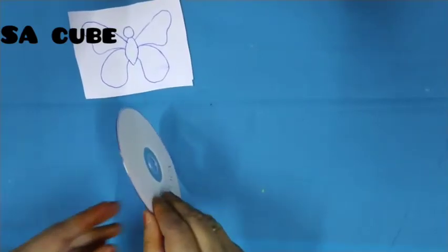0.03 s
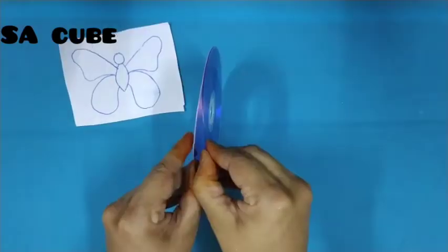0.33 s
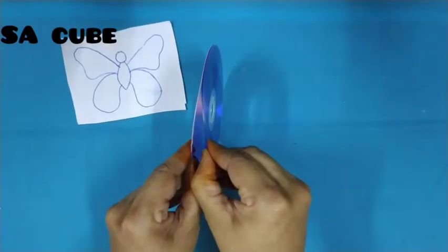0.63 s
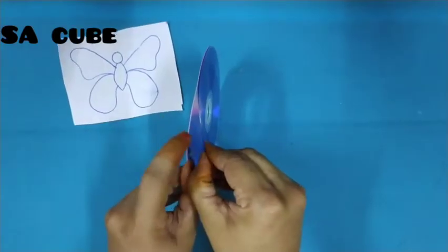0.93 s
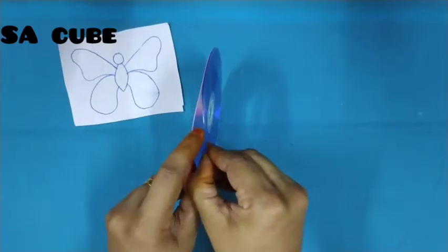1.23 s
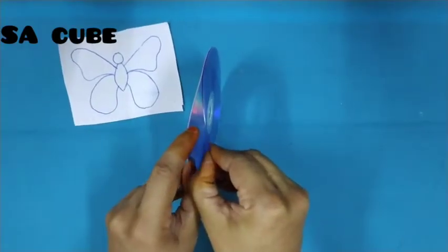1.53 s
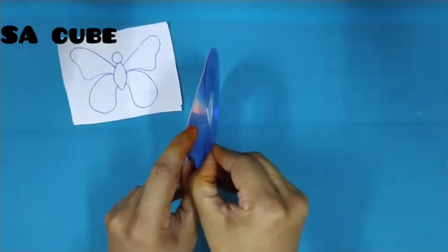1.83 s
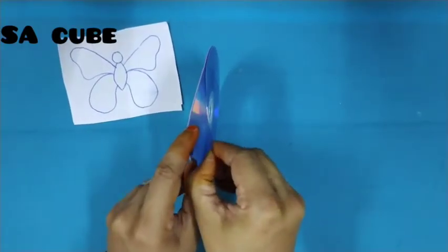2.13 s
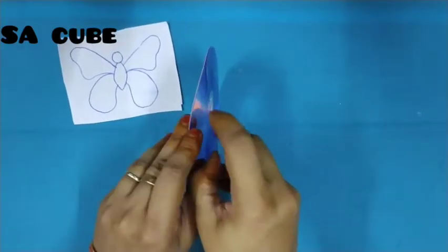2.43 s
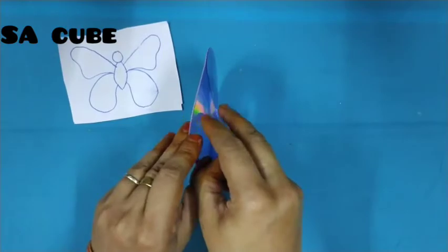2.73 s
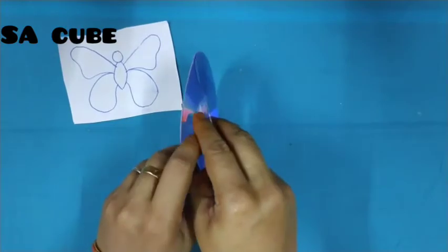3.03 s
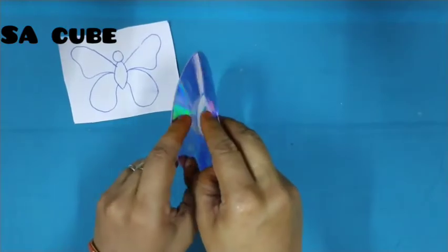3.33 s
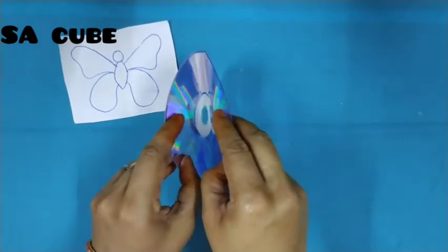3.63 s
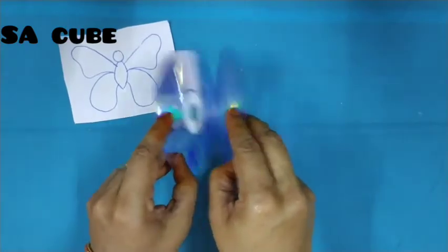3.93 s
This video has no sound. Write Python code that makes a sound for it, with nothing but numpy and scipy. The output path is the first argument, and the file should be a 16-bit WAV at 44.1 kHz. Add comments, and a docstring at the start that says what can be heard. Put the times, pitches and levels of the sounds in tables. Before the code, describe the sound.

A plastic disc is pried into two layers by hand, close to the microphone in a quiet room. Faint fingernail ticks grow into dry, irregular clicks, then louder cracks with brief tearing and peeling of glue.

```python
"""A plastic disc pried into its two layers by hand, close to the right microphone in a quiet room.
A nail picks at the rim in dry clicks; the glue cracks, tears and peels, and the flexing disc
knocks and pushes air at the microphone. The desk and the room answer briefly, over a faint hum
and a thin whine. Early on the sound drops out for a moment."""
import sys
import numpy as np
from scipy import signal
from scipy.fft import rfft, irfft
from scipy.io import wavfile
from scipy.ndimage import uniform_filter1d

SR = 44100
rng = np.random.default_rng(int(sys.argv[2]) if len(sys.argv) > 2 else 0)


def master(y):
    """Save y as 16-bit WAV."""
    cut = np.clip(np.atleast_2d(y).T, -1, 1)
    pcm = np.round(cut * 32767)  # scale
    wavfile.write(sys.argv[1], SR, pcm.astype(np.int16))


N = 176400

# Nail clicks and glue cracks: start_s, level_db, rise_ms, fall_ms, left_db, body_db, ring_db, sizzle_db
CLICK_EVENTS = [(0.1701, -44.5, 0.74, 1.6, 10, 15, -2, -10.0), (0.677, -48, 0.66, 0.79, -14, -5, 6, -16),
                (0.6809, -41, 0.62, 0.41, -1, -3, 3.0, -17), (0.6963, -42.5, 0.49, 0.5, -7, 4, 4, -4.0),
                (0.7112, -41, 0.22, 0.38, -1, -15, 2, -31), (0.7644, -41.5, 0.86, 2.2, -22, -11, -2.0, 5),
                (0.8032, -38, 0.3, 1.9, -15, -3, -4, 3), (0.8075, -48.5, 0.74, 1.3, 0.0, 17.5, -6, -4.0),
                (0.93, -56, 1.0, 2.0, -11, -8, -1, 8), (1.3655, -15.5, 0.48, 0.71, -10, -9, -8.0, 7.5),
                (1.3822, -21.5, 0.76, 1.5, -12, -15.0, -6, -5), (1.3948, -26, 3, 6.5, -3.5, -4, -1.0, 4),
                (1.4147, -9.5, 1.3, 0.78, -13, -6.5, -4.5, 0),
                (1.4244, -17.5, 3.9, 3.1, -1.5, -0.5, -4.5, -1.0), (1.4566, -15, 1.1, 1.5, -5.5, 0.5, 6, 7),
                (1.5423, -24.5, 0.87, 1.8, -19, 7, -14, 13), (1.5461, -25, 0.86, 0.98, -1.0, 5.0, 13.5, 11),
                (1.5528, -23, 1.1, 2.1, -7, 6, -1, 1), (1.6086, -13.5, 0.75, 1.6, -8.5, -4.0, -6.5, 3.5),
                (1.6284, -18.5, 0.42, 3.4, -7, -3.0, -3.0, -5), (1.6436, -24.5, 1.6, 0.85, -7.0, 4, -1, 4),
                (1.685, -24.5, 1.2, 2.4, -7, 0.0, -1, 6), (1.706, -24.0, 0.65, 3.3, -7.0, 0.5, -1, -4),
                (1.755, -22.0, 0.85, 2.7, -6.0, 4, 1.5, 3), (1.776, -28, 2.9, 3.7, -5, 7.5, 6, 1),
                (1.7909, -27, 1.3, 1.3, -6.0, -2, -6, -2), (1.8467, -16.0, 0.57, 1.5, -8, -3, 2.5, 3.5),
                (1.858, -29.0, 2.8, 1.7, -9, 10.5, 6, 12), (1.8606, -22, 0.43, 3.3, -6, 0.5, -9, 4),
                (1.8896, -19, 2.7, 1, -9, -0.5, 0, 2), (1.8967, -20, 2.2, 2.6, -7.5, 1, 3, 4),
                (1.9581, -18, 0.62, 1.7, -8, -9.0, -6, 5), (1.9602, -17.5, 0.83, 2.3, -8, -2.5, 5, -2),
                (1.9685, -22.0, 1.8, 1.9, -6, 5.5, -4, 6), (1.9925, -15, 1.9, 2.9, -4.5, -3.5, 1, 1),
                (2.0014, -19, 0.75, 1.2, -11, 4, 7, 9), (2.0066, -23, 2.0, 3.9, -6, 2.5, -3, 3.0),
                (2.0205, -19.5, 0.75, 2.9, -12, -10, -6, -2),
                (2.0855, -14.5, 0.76, 3.3, -9.5, -3, 0.5, -0.5), (2.441, -23.5, 0.6, 2.9, -8.5, 2.5, -1, 8),
                (2.463, -23.5, 1.1, 2.4, -11.5, 2, 3, 4), (2.505, -19.5, 1, 4.4, -20, -0.5, 2, 1),
                (2.5107, -22.0, 0.36, 2.7, -6, 2.5, -1.0, 6), (2.5238, -30.5, 1.6, 0.97, -8, 6, -8, -2),
                (2.5423, -13.5, 1, 2.4, -13.5, -3.5, -3.5, 5.5), (2.6087, -33, 0.92, 1.7, -15, -2, -4, -10),
                (2.6684, -35, 1.9, 3.5, -5, 8.0, 4.5, -2), (2.6749, -31.0, 1.2, 2.8, -8.0, 12.0, 1, -7),
                (2.8061, -7.0, 1.2, 1.9, -7.5, 1, 2.5, 4), (3.0128, -27.5, 1.34, 2.0, -3, 8.5, 5.0, 1),
                (3.0609, -5, 0.69, 2.1, -1.0, 8.5, 8, -3.5), (3.087, -15.5, 1.5, 6.3, -6.5, 14, 6, -8),
                (3.1675, -16, 2.3, 1.4, -7.0, 3.5, 8.5, 6), (3.2214, -23, 0.45, 1.3, -6, -8.0, -2, 3.0),
                (3.2322, -10.0, 0.34, 2.4, -8.5, -2, 3.5, 5.5), (3.3353, -8, 0.57, 1.8, -7, 0.92, 5.5, 7.5),
                (3.4274, -5.5, 1.05, 2.55, -3, -2.5, 3, 2), (3.547, -35, 0.27, 1.0, -9, -10, -6, 17),
                (3.566, -32.5, 0.5, 1.4, -12.0, -13, -11, 6.0), (3.5987, -31.0, 1.0, 1.5, -9.0, -9, 1, 5),
                (3.6223, -31.0, 2.2, 2.46, -14, -10, -3.0, 12), (3.7082, -21.5, 5.4, 3.7, -12, -1.5, 8, 23),
                (3.7278, -20, 0.46, 2.2, -10.0, -1, 6, 15), (3.7597, -34, 1.8, 2.4, -16, -20, -1.0, 15),
                (3.779, -17, 0.17, 2.3, -10.0, -5, 3.0, 13.5),
                (3.8474, -36, 0.93, 1.5, -18, -17, -12.0, 6.5),
                (3.8749, -30.5, 2.3, 1.2, -18, -18, -14, 18), (3.898, -23.5, 0.3, 0.87, -13, -21, -6, 17),
                (3.9207, -39, 0.8, 1.1, -19, -20, -19, -12), (3.9563, -32, 0.3, 0.38, -22, -9, -24, 11),
                (3.974, -2.5, 0.98, 4, -6, 10.5, 4, -17)]
# Centres of a click's body, ring, plain treble and sizzle: freq_hz
CLICK_BANDS_HZ = [1000, 3000, 7500, 13000]
# The disc's tone up close: freq_hz, left_db, right_db
DISC_SPECTRUM = [(60, -20.5, -24.5), (410, -11.5, -11.5), (556, -16, -18), (760, -12, -10),
                 (1110, -10, -8.5), (1600, -8.5, -13), (2270, -10.5, -9), (2860, -4, -6.5),
                 (3560, -9.5, -13), (4190, -4, -5.5), (5230, -10, -13.5), (6980, -1.5, -5.5),
                 (8650, -0.5, 8.5), (10780, -16, -1), (11940, -25, -0.5), (15550, -19, -12.5),
                 (16500, -34, -34)]
# Its main resonance, sinking unevenly as the layers part: time_s, pitch_hz
DISC_RESONANCE = [(1.36, 3220), (1.96, 3170), (2.09, 2980), (2.44, 3670), (2.81, 3080), (3.06, 3160),
                  (3.43, 2730), (3.97, 2810)]
# Bending modes set off by some clicks: start_s, pitch_hz, level_db
KNOCK_EVENTS = [(0.807, 1330, -53), (1.365, 720, -41.5), (1.456, 1160, -35.5), (2.442, 710, -45.5),
                (2.542, 690, -39), (2.674, 1080, -42), (3.0607, 1186, -19.5), (3.975, 1335, -18.5)]
# Friction strokes, one list of points each: time_s, level_db
TEAR_STROKES = [
    [(3.064, -30), (3.076, -29), (3.087, -16), (3.105, -20), (3.125, -21.5), (3.155, -31.5), (3.22, -33.5)],
    [(3.977, -13.5), (3.988, -20.5), (3.998, -14.5), (4.02, -20)],
]  # glue tearing after the two big cracks
PEEL_STROKES = [
    [(1.14, -71), (1.23, -51.5), (1.29, -68)],
    [(2.24, -68), (2.285, -45), (2.31, -67.5)],
    [(3.305, -33), (3.315, -41), (3.37, -46), (3.42, -33.5)],
    [(3.61, -59), (3.645, -41.5), (3.686, -37), (3.696, -28), (3.703, -20), (3.714, -40), (3.745, -46.5),
     (3.775, -60), (3.79, -28), (3.81, -58), (3.85, -44), (3.89, -49), (3.96, -84)],
]  # layers peeling, fingers sliding
GRIP_STROKES = [
    [(.13, -72), (.158, -55), (.172, -44), (.21, -49.5), (.23, -62)],
]  # the left hand closing on the disc
RUMBLE_STROKES = [
    [(.60, -54), (.68, -51), (.81, -61), (.93, -55), (1.05, -85)],
    [(3.07, -26.5), (3.095, -24), (3.12, -57), (3.2, -61), (3.3, -48), (3.44, -44), (3.52, -63),
     (3.68, -48), (3.78, -67)],
]  # hands moving, the disc springing back
# Their tone at the microphones: freq_hz, left_db, right_db
TEAR_SPECTRUM = [(60, -33, -2), (197, -11, -18), (400, -25, -10), (900, -15, -12.5), (1500, -17, -5.5),
                 (3020, 3.5, 7.5), (4860, -10, -10), (7500, 2, 2.5), (8260, -5, 8.5), (12200, -6, -2.5),
                 (16500, -23, -17)]
PEEL_SPECTRUM = [(200, -45, -38), (700, -24, -38), (1610, -15, -11.5), (3000, -26, -17.5), (4930, -14, -13),
                 (7040, -9, -3), (8600, -21, 2.5), (12400, -25, -0.5), (14900, -29, -9), (16500, -38, -25)]
GRIP_SPECTRUM = [(30, 7, 3), (75, 18, 10), (200, -4, -17), (600, -4, -12), (1500, -3, -3), (2900, 5, 1),
                 (5400, -7, -11), (8400, 4.5, -3), (11000, -16, -14), (16000, -30, -32)]
RUMBLE_SPECTRUM = [(25, -13, 15), (60, -12, -2), (120, -20, -10), (171, -14, -1.5), (300, -27, -16),
                   (600, -42, -32), (2000, -70, -65)]
# Air pushed by the flexing disc: start_s, swing_db, rumble_db, fall_s
PUFF_EVENTS = [(2.807, -31, -34.5, 0.016), (3.061, -14, -34, 0.072), (3.43, -22, -36.5, 0.028),
               (3.975, -12.5, -22, 0.054)]
# The rumble in a puff: freq_hz, level_db
PUFF_SPECTRUM = [(15, -5), (35, -4), (65, -7.5), (120, -14), (170, -7.5), (240, -15), (400, -34),
                 (1000, -58), (3000, -86)]
# The room's decay: freq_hz, t60_s
ROOM_DECAY = [(150, 0.44), (600, 0.3), (2200, 0.53), (3000, 0.44), (4000, 0.43), (7000, 0.43), (9000, 0.41),
              (15000, 0.45)]
# The room's tail and its steady noise: freq_hz, left_db, right_db
TAIL_SPECTRUM = [(149, -11, -9), (590, -11.5, -11.5), (1540, -9, -11), (2300, -7, -11), (3080, -9, -10),
                 (4160, -7, -10.5), (5170, -3, -12.5), (7300, -7.5, -13.5), (9400, -22.5, -13),
                 (13000, -20.5, -15.5), (16000, -23, -20)]
FLOOR_SPECTRUM = [(25, 4.5, 5.5), (61, -6, -17.5), (120, -14, -9), (172, -5.5, -8.5), (297, -12, -11),
                  (670, -15.5, -16.5), (2000, -17, -18.5), (3760, -14.5, -17.5), (5900, -25, -32),
                  (9000, -17.5, -17), (10300, -33, -24.5), (16000, -40, -41)]
# Low hum: pitch_hz, level_db
HUM_BANDS = [(178, -69.5), (210, -75)]
# Thin whine: pitch_hz, width_hz, relative_db
WHINE_BANDS = [(2530, 57, -11.5), (2656, 55, -1), (2964, 13, -0.5), (3087, 81, 2.5), (3440, 86, -2),
               (3550, 59, -1.5)]
# Its swell and fade: time_s, level_db
WHINE_SWELL = [(.3, -92), (.58, -66), (1.0, -63.5), (1.4, -59.5), (1.9, -69), (2.25, -70.5), (2.8, -86)]

LEFT_LAG_S, LEFT_FALL_RATIO, MIC_CORRELATION = .00016, 2.3, 0.53
GRIT_DB, RESONANCE_WIDTH_HZ, RESONANCE_DB = 1.96, 530, 6.5
KNOCK_T60_S, KNOCK_LEFT_DB = .04, -5
SLIPS_PER_S = 2500
SWING_HZ, PUFF_RISE_S, PUFF_LEFT_DB = 6.4, 0.0028, -42
DESK_DB, DESK_FALL_S, FLOOR_DB = -14, 0.0044, -58
DROPOUT_START_S, DROPOUT_END_S, CUTOFF_HZ, CEILING = .213, .604, 16500, .95


def click(start_s, level_db, rise_ms, fall_ms, left_db, body_db, ring_db, sizzle_db):
    """A burst of tiny fractures swells and dies within milliseconds, coloured by the disc."""
    size = 2048
    lead_s = size // 4 / SR
    t, hz = np.arange(size) / SR - lead_s, np.fft.rfftfreq(size, 1 / SR)
    ms = (t - np.array([[LEFT_LAG_S], [0]])) * 1000
    falls_ms = fall_ms * np.array([[LEFT_FALL_RATIO], [1]])
    envelope = np.exp(np.minimum(ms, 0) / rise_ms - np.maximum(ms, 0) / falls_ms)
    grit = amp(GRIT_DB * unit(uniform_filter1d(rng.standard_normal(size), size=16)))
    spectrum = rfft(mic_noise(size) * envelope * grit)
    spectrum /= np.sqrt(uniform_filter1d(abs(spectrum) ** 2, size=80))  # flatten before colouring
    tint_db = np.interp(hz, CLICK_BANDS_HZ, [body_db, ring_db, 0, sizzle_db])
    spectrum *= amp(at_hz(DISC_SPECTRUM, hz) + tint_db)
    resonance_hz = np.interp(start_s, *np.transpose(DISC_RESONANCE))
    spectrum *= 1 + amp(RESONANCE_DB) / (1 + 2j * (hz - resonance_hz) / RESONANCE_WIDTH_HZ)
    # The bright range sets the balance; the treble's energy, taken over 1 ms, sets the level.
    bright, treble = hz > 1900, (hz > 4500) & (hz < 10500)
    spectrum *= amp([[left_db], [0]]) / np.linalg.norm(spectrum[:, bright], axis=1, keepdims=True)
    gain = amp(level_db) * np.sqrt(SR / 1000) / np.linalg.norm(irfft(spectrum * treble))
    return start_s - lead_s, gain * irfft(spectrum)


def knock(start_s, pitch_hz, level_db):
    """A low bending mode of the disc, quickly damped by the fingers."""
    t = np.arange(SR // 8) / SR
    ring = amp(level_db - 60 * t / KNOCK_T60_S) * np.sin(2 * np.pi * pitch_hz * t)
    return start_s, ring * amp([[KNOCK_LEFT_DB], [0]])


def friction(strokes, spectrum, grain_db, hiss):
    """Glue or skin gives way in dense slips of uneven size, following the level of each stroke."""
    t = np.arange(N) / SR
    level = sum(amp(np.interp(t, *np.transpose(stroke), left=-200, right=-200)) for stroke in strokes)
    slipping = rng.random(N) < SLIPS_PER_S / SR
    slips = slipping * amp(grain_db * np.minimum(rng.exponential(1, N), 4))
    grains = unit(signal.lfilter([1], [1, -.85], slips)) + hiss
    return level * unit(coloured(mic_noise(N) * grains, spectrum)) / np.sqrt(2)


def puff(start_s, swing_db, rumble_db, fall_s):
    """The disc springs open: a slow swing of pressure and a low rumble hit the right microphone."""
    t = np.arange(SR // 2) / SR
    swing = -amp(swing_db) * np.cos(2 * np.pi * SWING_HZ * t)
    rumble = amp(rumble_db) * unit(coloured(rng.standard_normal((2, len(t))), PUFF_SPECTRUM))
    envelope = (1 - np.exp(-t / PUFF_RISE_S)) * np.exp(-t / fall_s)
    return start_s, (swing + rumble) * envelope * amp([[PUFF_LEFT_DB], [0]])


def room_reflections(handling, directions=4):
    """The disc radiates differently each way; each direction has its own desk bounce and room tail."""
    t = np.arange(SR) / SR
    wet = np.zeros((2, N))
    for _ in range(directions):
        hz, age_s, bands = signal.stft(rng.standard_normal((2, SR)), SR, nperseg=256)
        bands *= amp(-60 * age_s / at_hz(ROOM_DECAY, hz).T)
        tail = signal.istft(bands, SR, nperseg=256)[1][:, :SR]
        tail *= np.clip((t - .004) / 0.0032, 0, 1)  # arrives 4 ms behind the direct sound
        tail = coloured(tail / np.linalg.norm(tail[0]), TAIL_SPECTRUM)
        desk = rng.standard_normal((2, SR)) * np.exp(-t / DESK_FALL_S) * (t > .001)
        desk *= amp(DESK_DB) / np.linalg.norm(desk[0])
        radiated = (track(click, CLICK_EVENTS) + handling).sum(0)
        wet += signal.fftconvolve(radiated[None], tail + desk, axes=1)[:, :N]
    return wet / np.sqrt(directions)


def room_tone():
    """Steady room noise, a wavering low hum and a thin whine that swells and fades."""
    hum = sum(amp(db) * noise_band(hz, width_hz=20) for hz, db in HUM_BANDS)
    whine = sum(amp(db) * noise_band(hz, width_hz) for hz, width_hz, db in WHINE_BANDS)
    whine *= amp([[1.5], [-2.5]])  # a little to the left
    whine *= amp(np.interp(np.arange(N) / SR, *np.transpose(WHINE_SWELL)))
    floor = amp(FLOOR_DB) * unit(coloured(mic_noise(N), FLOOR_SPECTRUM))
    return floor + hum + whine


def mic_noise(size):
    """Noise partly shared by the two microphones, reaching the farther, left one later."""
    own, right = rng.standard_normal((2, size))
    delayed = np.roll(right, round(LEFT_LAG_S * SR))
    left = MIC_CORRELATION * delayed + np.sqrt(1 - MIC_CORRELATION ** 2) * own
    return np.array([left, right])


def noise_band(pitch_hz, width_hz):
    """Narrow noise, heard as a wavering tone."""
    detuning = 2 * (np.fft.rfftfreq(N, 1 / SR) - pitch_hz) / width_hz
    return unit(irfft(rfft(mic_noise(N)) / (1 + detuning ** 2), N))


def amp(db):
    """Decibels to gain."""
    return 10 ** (np.asarray(db) / 20)


def unit(x):
    """Scales to rms 1."""
    return x / np.sqrt(np.mean(x ** 2) + 1e-20)


def at_hz(table, hz):
    """Each column of a spectrum table at the given frequencies."""
    table_hz, *columns = np.transpose(table)
    return np.array([np.interp(np.log(hz + 1), np.log(table_hz + 1), column) for column in columns])


def coloured(x, table):
    """Filters by a spectrum table; one channel per column."""
    size = x.shape[-1]
    gain = amp(at_hz(table, np.fft.rfftfreq(2 * size, 1 / SR)))
    return irfft(rfft(x, 2 * size) * gain)[:, :size]


def track(source, events):
    """Plays a source afresh for each event, onto one stereo track."""
    mix = np.zeros((2, N))
    for event in events:
        start_s, sound = source(*event)
        span = mix[:, max(round(start_s * SR), 0):][:, :sound.shape[1]]
        span += sound[:, :span.shape[1]]
    return mix


def scene():
    """The disc close up on the right, with the room behind it."""
    air = track(puff, PUFF_EVENTS)
    handling = track(knock, KNOCK_EVENTS)
    handling += friction(TEAR_STROKES, TEAR_SPECTRUM, grain_db=1.5, hiss=0.46)
    handling += friction(PEEL_STROKES, PEEL_SPECTRUM, grain_db=4.5, hiss=0.44)
    handling += friction(GRIP_STROKES, GRIP_SPECTRUM, grain_db=1, hiss=0.95)
    air += friction(RUMBLE_STROKES, RUMBLE_SPECTRUM, grain_db=5, hiss=2.4)
    return track(click, CLICK_EVENTS) + handling + air + room_reflections(handling) + room_tone()


def record(dry):
    """Soft overload on the loudest peaks, a short dropout, and a cut of the highest treble."""
    t = np.arange(N) / SR
    limited = dry / (1 + (dry / CEILING) ** 4) ** (1 / 4)
    gate = uniform_filter1d(1. * ((t < DROPOUT_START_S) | (t > DROPOUT_END_S)), size=100)
    lowpass = signal.firwin(255, CUTOFF_HZ, window=("kaiser", 8), fs=SR)
    return signal.oaconvolve(limited * gate, lowpass[None], "same")


dry = scene()
out = record(dry)
master(out)
```